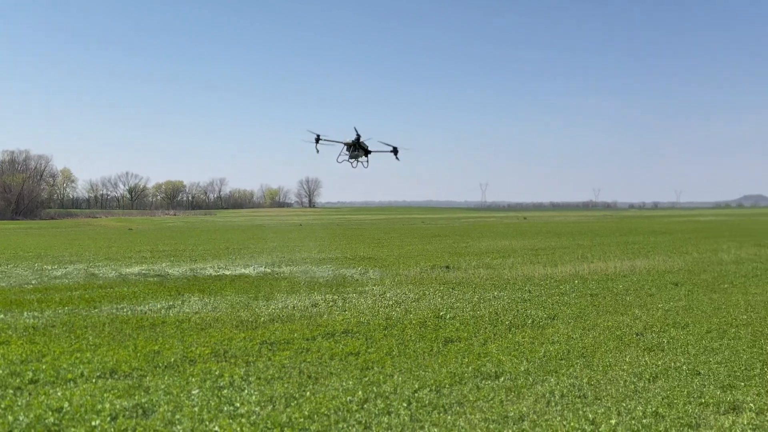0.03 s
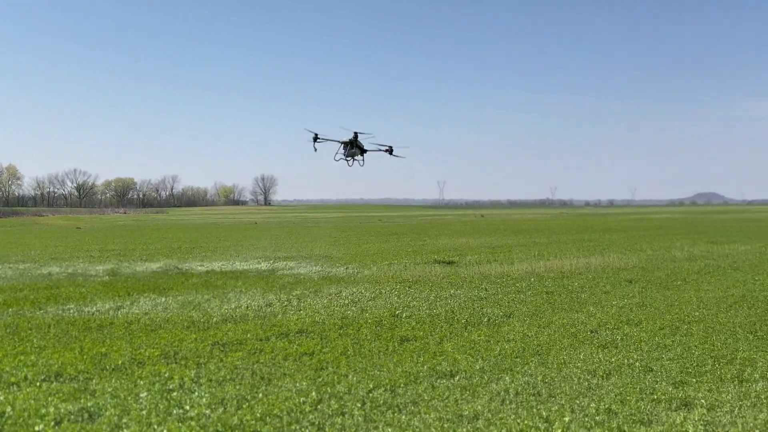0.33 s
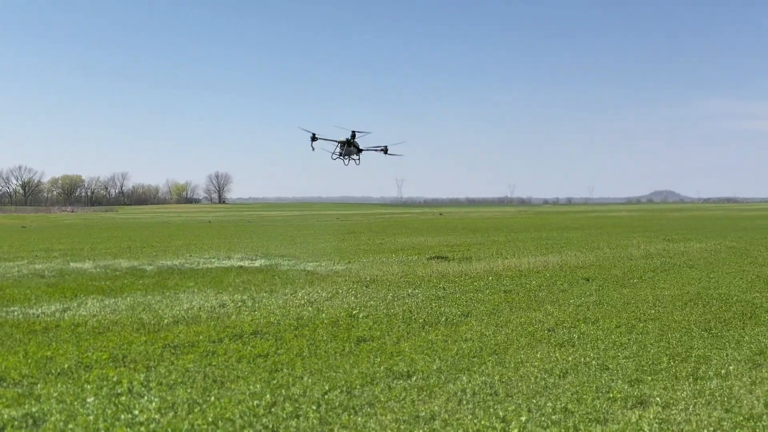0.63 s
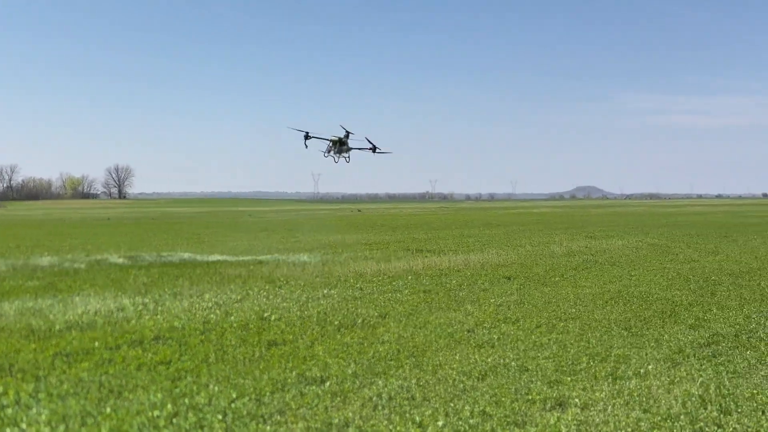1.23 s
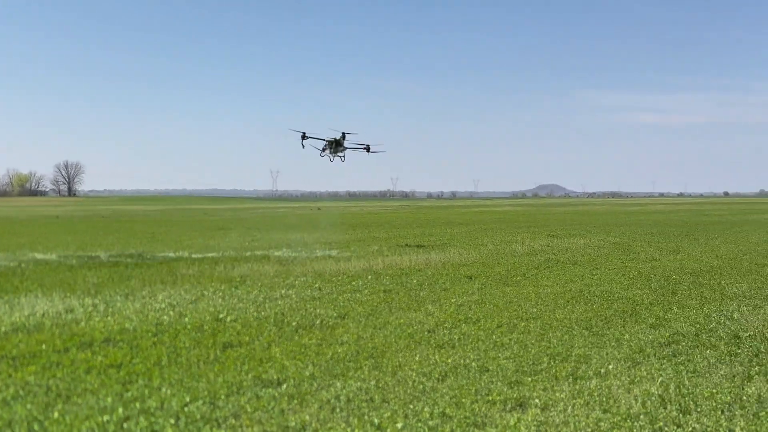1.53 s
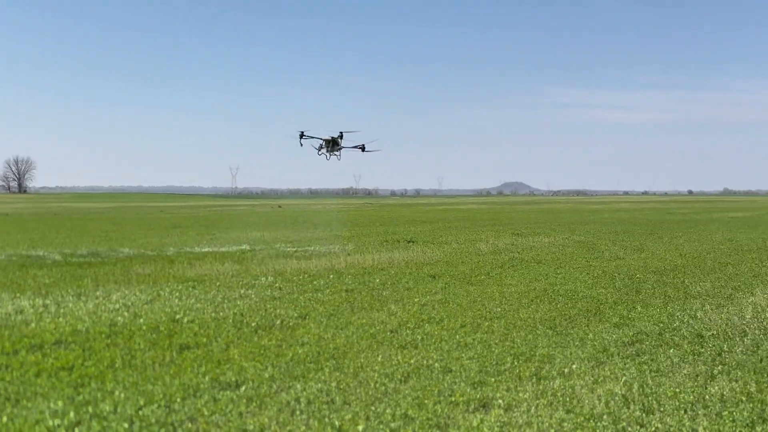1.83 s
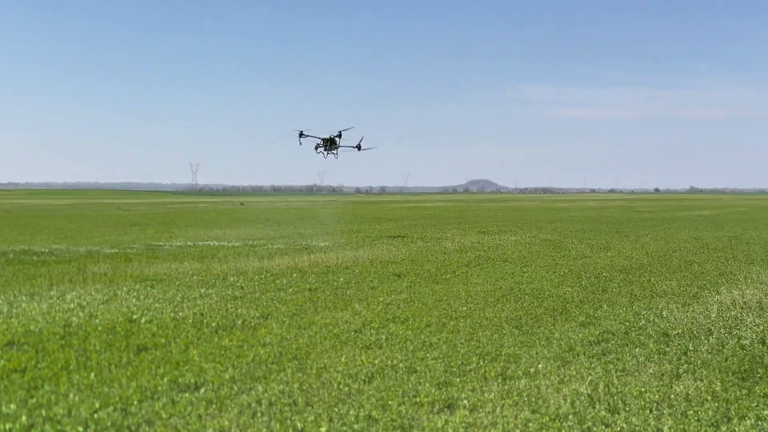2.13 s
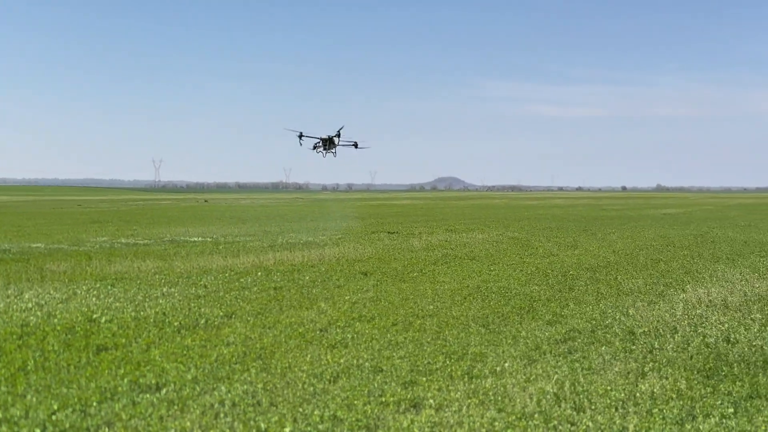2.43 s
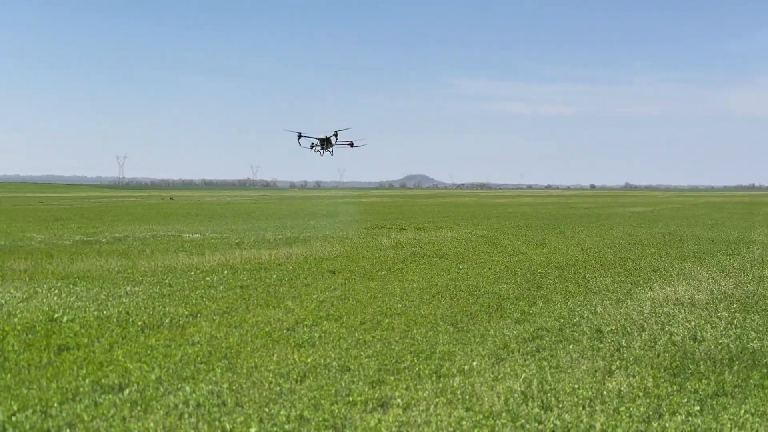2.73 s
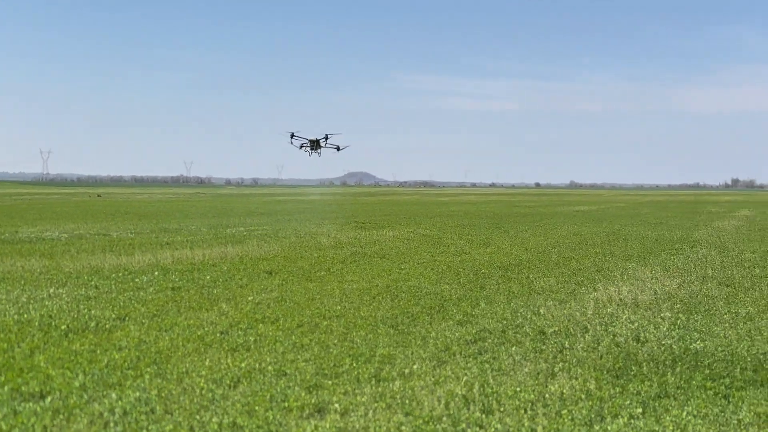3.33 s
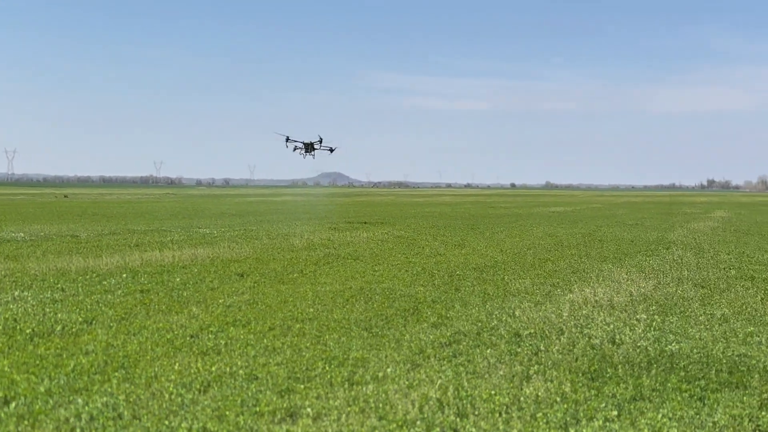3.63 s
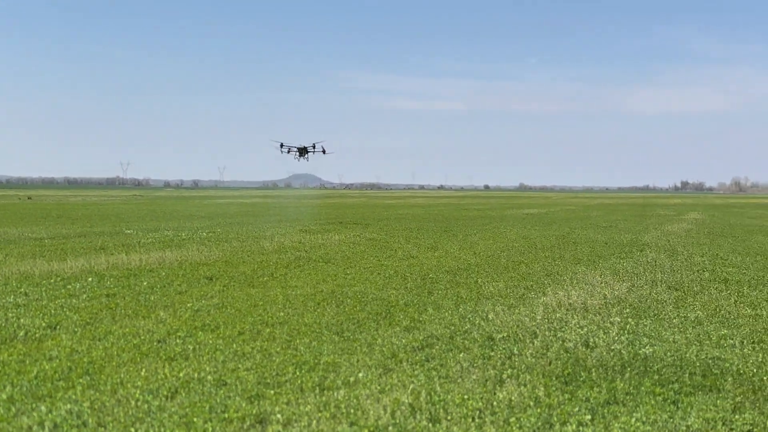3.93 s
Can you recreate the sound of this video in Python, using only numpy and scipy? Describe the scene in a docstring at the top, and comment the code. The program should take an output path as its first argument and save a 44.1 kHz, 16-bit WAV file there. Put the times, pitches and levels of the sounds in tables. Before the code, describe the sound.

A large drone flies low across a field, its rotors rushing and its motors whining on and off, then recedes after a short rasp of blades. Wind thumps the microphone, mostly early, over the steady hum of an engine close by.

```python
"""Spray drone leaving over a field

A large drone flies away low: four rotors swish and throb at slightly different rates, and the ground
echo sweeps upward through their rush. The motors whine in spells; one rotor slaps briefly in its wake.
Close by, a steady engine, probably a generator, hums and clatters. Wind buffets the microphone."""
import sys
import numpy as np
from scipy import signal
from scipy.fft import rfft, irfft
from scipy.io import wavfile

SR = 44100
rng = np.random.default_rng(int(sys.argv[2]) if len(sys.argv) > 2 else 0)


def waveform_to_disk(signal):
    """Save audio, clipped to [-1, 1], as 16-bit WAV at the path in sys.argv[1]."""
    frames = np.transpose(np.atleast_2d(signal))
    scaled = np.clip(frames, -1, 1) * 32767
    samples = np.round(scaled).astype(np.int16)
    wavfile.write(sys.argv[1], SR, samples)


N = 176400


def undb(db):
    """Decibels to gain."""
    return 10 ** (np.asarray(db) / 20)


def curve(rows, column=1):
    """Automation: one column of a time table, at every sample."""
    rows = np.array(rows)
    return np.interp(np.arange(N) / SR, rows[:, 0], rows[:, column])


def gains(points, hz):
    """Gain of an EQ curve of (Hz, dB) points at the given frequencies."""
    points = np.array(points)
    return undb(np.interp(np.log(hz + 1e-6), np.log(points[:, 0]), points[:, 1]))


def bins():
    """Frequencies of the spectrum in Hz."""
    return np.arange(N // 2 + 1) * SR / N


def colour(x, gain, band=None):
    """Filter white noise, keeping its rms; given a band in Hz, that band alone carries this rms."""
    inside = 1 if band is None else (bins() > band[0]) & (bins() < band[1])
    return irfft(rfft(x) * gain / np.sqrt(np.mean(gain ** 2 * inside)), N)


def drift(hz):
    """Smooth random motion up to about hz, with a spread of 1."""
    return colour(rng.standard_normal(N), np.exp(-(bins() / hz) ** 2))


def stereo_noise(side_gain):
    """Mid/side noise; the side gain sets its width."""
    mid, side = rng.standard_normal((2, N))
    return mid + irfft(rfft(side) * side_gain, N) * np.array([[1], [-1]])


def bursts(cycles, width):
    """One smooth burst of power per cycle, with a mean of 1."""
    power = np.exp((np.cos(2 * np.pi * cycles) - 1) / (2 * np.pi * width) ** 2)
    return power / power.mean()


def pulsed(x, power, share):
    """Let a share of the sound's power follow a pulse train."""
    share = np.clip(share, 0, 1)
    return x * np.sqrt(1 - share + share * power / power.mean())


def blade_passes():
    """Each passing blade pushes a swish and a pressure pulse: returns swish envelope and throb."""
    # Each row: a rotor's blade-pass rate in Hz, relative level in dB.
    blade_rates = [(48.2, -1), (46.2, -1), (44.6, -1.5), (42.9, -2)]
    # Each row: frequency in Hz, relative harmonic level in dB.
    throb_eq = [(40, -6), (90, 3.5), (140, 1.5), (190, 6), (280, -5.5), (450, -6)]
    # The throb's edge as the drone turns away. Each row: time in seconds, gain in dB above edge_hz.
    throb_edge = [(0, -6), (1.2, 0), (2, 5.5), (3, 2.5), (3.6, 2)]
    edge, edge_hz = undb(curve(throb_edge)), 260
    wander, scatter_db, flutter_db = .028, 2, 3
    swish = throb = 0
    for hz, db in blade_rates:
        cycles = np.cumsum(hz * (1 + wander * drift(1.927))) / SR + rng.random()
        swish += undb(db + scatter_db * drift(33)) ** 2 * bursts(cycles, width=.076)
        load = undb(db + flutter_db * drift(5.4))
        for k in range(1, 11):
            level = load * gains(throb_eq, k * hz) * (edge if k * hz > edge_hz else 1)
            throb += level * np.sin(2 * np.pi * (k * cycles + rng.random()))
    return swish, throb / throb.std()


def ground_echo(direct):
    """A reflection dulled by grass; against the direct sound its shrinking lag sweeps a comb upward."""
    # Each row: time in seconds, lag in milliseconds.
    lag_ms = [(0, 1.4), (.8, 1.155), (1.5, 0.93), (2.5, 0.62), (4, 0.37)]
    reflection, cutoff_hz = .48, 1380
    dulled = irfft(rfft(direct) / (1 + (bins() / cutoff_hz) ** 4), N)
    delayed = np.arange(N) - curve(lag_ms) * SR / 1000
    return reflection * np.array([np.interp(delayed, np.arange(N), channel) for channel in dulled])


def rotors():
    """Air rushes and hisses past the blades, chopped over their throb, and fades as the drone recedes."""
    # The fly-away fade. Each row: time in seconds, body gain in dB, hiss gain in dB.
    flight = [(0.0, -53.5, -64), (0.04, -53, -65), (0.29, -52, -60.5), (1.2, -52.5, -67), (1.38, -54, -69),
              (1.47, -52.5, -65.5), (1.88, -53.5, -69.5), (2.6, -54, -70), (3.06, -55, -72),
              (3.6, -61.5, -74.5), (3.81, -66, -81.5), (4.0, -68, -83)]
    # Each row: time in seconds, share of the rush that comes in swishes (0-1).
    chop_share = [(0, 0.47), (2.4, 0.44), (3, 0.7), (3.35, 0.57), (4, 0.27)]
    # Tone of the rush. Each row: frequency in Hz, relative level in dB.
    rush_eq = [(60, 6.5), (160, -2.5), (330, 7.5), (700, 8.5), (1300, 8.5), (2200, 5), (3500, 1.5),
               (5500, -8.5), (8000, -17.5), (15000, -78)]
    # Tone of the high hiss. Each row: frequency in Hz, relative level in dB.
    hiss_eq = [(2000, -42), (4500, 4.5), (6000, 8), (7000, 3), (8500, 7.5), (10000, 9.5), (11200, 8.5),
               (13500, 7.5), (15500, 3.5)]
    # Stereo width. Each row: frequency in Hz, side minus mid in dB.
    air_width = [(100, -20), (700, -13.5), (1500, -5.5), (2600, -13), (3400, -19), (4200, -65), (7000, -56)]
    rush_trim_db, hiss_trim_db, throb_trim_db = -1.79, 5.5, .8
    swish, throb = blade_passes()
    chop = curve(chop_share)
    air = stereo_noise(gains(air_width, bins()))
    rush = colour(pulsed(air, swish, chop), gains(rush_eq, bins()), band=(2200, 4500))
    hiss = colour(pulsed(air, swish, .81 * chop), gains(hiss_eq, bins()), band=(6000, 15000))
    throb *= undb(throb_trim_db + 4 * (chop - chop.mean()))  # harder chop, heavier throb
    body = undb(rush_trim_db) * rush + throb
    body += ground_echo(body)
    return body * undb(curve(flight)) + hiss * undb(curve(flight, column=2) + hiss_trim_db)


def gate(start, end, fade_s=.06):
    """A gate with soft edges."""
    t = np.arange(N) / SR
    return np.clip(np.minimum(t - start, end - t) / fade_s + .5, 0, 1)


def whistle(hz, jitter_hz=13):
    """A slightly jittery tone with an rms of 1."""
    return np.sqrt(2) * np.sin(2 * np.pi * np.cumsum(hz + jitter_hz * drift(75)) / SR)


def motors():
    """A firm and a wavering whine swell together; brief glides cross them as a motor corrects the trim."""
    # Each row: time in seconds, base pitch in Hz.
    pitch = [(0, 4795), (.28, 4885), (.45, 4835), (.68, 4815), (.8, 4765), (1.45, 4765), (1.72, 4850),
             (2.02, 4795), (2.35, 4825), (2.55, 4770), (3.18, 4835), (3.5, 4815), (3.7, 4755)]
    # Spells of whine. Each row: start and end in seconds, gain in dB.
    spells = [(-.03, 0.11, -54), (0.285, 0.754, -59.5), (.38, 0.713, -62), (1.202, 1.605, -63),
              (1.7, 2.258, -62.5), (1.83, 2.117, -64), (2.45, 2.56, -59), (3.146, 3.24, -57),
              (3.323, 3.37, -65), (3.446, 3.6, -62.5)]
    # Each row: a motor's pitch ratio, relative level in dB, pitch wander in Hz, flutter in dB.
    voices = [(1, -5.8, 6, 1.8), (1.056, -13.5, 16, 3.5)]
    # Trim glides. Each row: start and end in seconds, first and last pitch in Hz, level in dB.
    trims = [(2.022, 2.11, 4960, 4800, -62), (2.416, 2.55, 4810, 4915, -65)]
    floor_db = -74.5
    envelope = undb(floor_db) + sum(undb(db) * gate(start, end) for start, end, db in spells)
    pair = glides = 0
    for ratio, db, wander_hz, flutter_db in voices:
        level = undb(db + flutter_db * drift(26))
        pair += level * whistle(ratio * curve(pitch) + wander_hz * drift(8.9))
    for start, end, first_hz, last_hz, db in trims:
        glides += undb(db) * gate(start, end) * whistle(curve([(start, first_hz), (end, last_hz)]))
    return envelope * pair + glides


def generator():
    """A governed engine: exhaust hum on the orders of its cycle, and a burst of casing clatter in each."""
    # Exhaust hum. Each row: multiple of the cycle rate, level in dB.
    orders = [(2, -49.5), (3, -57), (4, -56.5), (5, -55), (7, -62), (11, -66.5), (14, -71.5)]
    # Tone of the clatter. Each row: frequency in Hz, relative level in dB.
    clatter_eq = [(150, 4.5), (350, 4), (600, 10), (950, 4.5), (1400, 9), (1750, 8.5), (1950, 9),
                  (2080, -29), (3000, -12), (6000, -29), (15000, -36)]
    # Casing resonances. Each row: centre in Hz, width in Hz, boost in dB.
    resonances = [(1411, 22, 7), (1891, 22, 8)]
    # Stereo width. Each row: frequency in Hz, side minus mid in dB.
    clatter_width = [(200, -25), (1400, -3), (2200, -7.5), (4000, -27)]
    cycle_hz, jitter, flutter_db, clatter_db = 29.97, .0018, 1.7, -55.5
    cycles = np.cumsum(cycle_hz * (1 + jitter * drift(2))) / SR
    hum = 0
    for k, db in orders:
        level = np.sqrt(2) * undb(db + flutter_db * drift(8))
        hum += level * np.sin(2 * np.pi * (k * cycles + rng.random()))
    casing = gains(clatter_eq, bins())
    for hz, width, db in resonances:
        casing *= 1 + (undb(db) - 1) / (1 + (2 * (bins() - hz) / width) ** 2)
    noise = stereo_noise(gains(clatter_width, bins()))
    knocks = pulsed(noise, bursts(cycles, width=.13), share=.46)
    return hum + undb(clatter_db) * colour(knocks, casing)


def wind():
    """A low rumble, and eddies that each thump the microphone; the deepest bass is cut."""
    # Tone of the rumble. Each row: frequency in Hz, relative level in dB.
    rumble_eq = [(20, -44), (33, -29), (48, 0), (80, 1), (150, 2), (210, -5), (300, -11.5), (500, -25),
                 (1500, -73)]
    # Each row: time in seconds, rumble level in dB before the low cut.
    breeze = [(0, -45.5), (.8, -42.5), (1.4, -48.5), (2, -47.5), (3, -55.5), (4, -51)]
    # Tone of a buffet. Each row: multiple of its centre frequency, relative level in dB.
    buffet_eq = [(.15, -30), (.4, -2), (1, 2.5), (1.5, -6), (2.2, -15), (4, -43), (10, -76)]
    # Smaller eddies sound higher.
    # Each row: peak time and half length in seconds, centre in Hz, level in dB before the low cut.
    buffets = [(.235, .01, 140, -42), (.283, .012, 115, -37), (.37, .012, 120, -41), (.462, .009, 210, -38),
               (.575, .025, 135, -38.5), (.706, .016, 130, -33.5), (.745, .016, 70, -36.5),
               (.798, .015, 85, -36), (.824, .008, 205, -32), (.856, .015, 88, -30.5),
               (.897, .022, 115, -37), (1.15, .01, 105, -41), (1.2, .008, 120, -41),
               (1.297, .012, 175, -38), (2.05, .025, 155, -44), (3.058, .016, 175, -41.5)]
    side_db, low_cut_hz = -13.5, 39
    t = np.arange(N) / SR
    rumble = undb(curve(breeze)) * colour(stereo_noise(undb(side_db)), gains(rumble_eq, bins()))
    air = stereo_noise(undb(side_db))
    for peak_s, half_s, hz, db in buffets:
        swell = np.exp(-.5 * ((t - peak_s) / half_s) ** 2)
        thump = swell * colour(air, gains(buffet_eq, bins() / hz))
        rumble += undb(db) * thump * np.sqrt(np.mean(swell ** 2) / np.mean(thump ** 2))
    return irfft(rfft(rumble) * (1 - 1 / (1 + (bins() / low_cut_hz) ** 8)), N)


def blade_slap():
    """Sharp rasps, one per blade, swell and die away as a rotor meets its wake."""
    # Tone of a slap. Each row: frequency in Hz, relative level in dB.
    slap_eq = [(200, -10), (700, 7), (1500, 5.5), (4000, -2), (6000, -11), (9000, -29), (15000, -28)]
    peak_s, half_s, blade_hz = 2.951, .18, 48.1
    peak_db, scatter_db = -53.5, 1.2
    from_peak = np.arange(N) / SR - peak_s
    rasps = rng.standard_normal(N) * np.sqrt(bursts(blade_hz * from_peak, width=.05))
    swell = undb(peak_db + scatter_db * drift(22)) * np.exp(-.5 * (from_peak / half_s) ** 2)
    return swell * colour(rasps, gains(slap_eq, bins()))


def scene():
    """Drone, engine and wind in the open air."""
    return rotors() + blade_slap() + motors() + generator() + wind()


def record(dry):
    """Spaced microphone ports put the top octave in and out of step; a steep low-pass cuts the top."""
    # Each row: frequency in Hz, cycles by which the left lags the right.
    port_lag = [(8350, 0), (9300, .45), (11100, 1), (12750, 1.5), (15500, 2.5)]
    top_hz = 15650
    lag = np.interp(bins(), *np.array(port_lag).T)
    heard = irfft(rfft(dry) * np.exp(1j * np.pi * lag * np.array([[-1], [1]])), N)
    return signal.sosfilt(signal.ellip(10, .1, 80, top_hz, fs=SR, output="sos"), heard)


dry = scene()
out = record(dry)
waveform_to_disk(out)
```